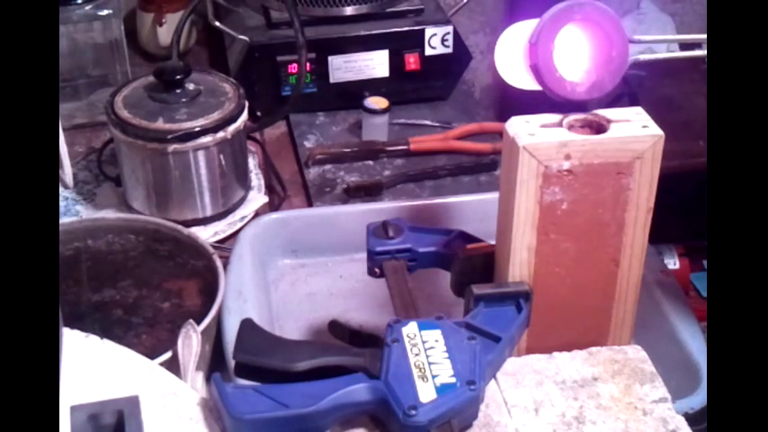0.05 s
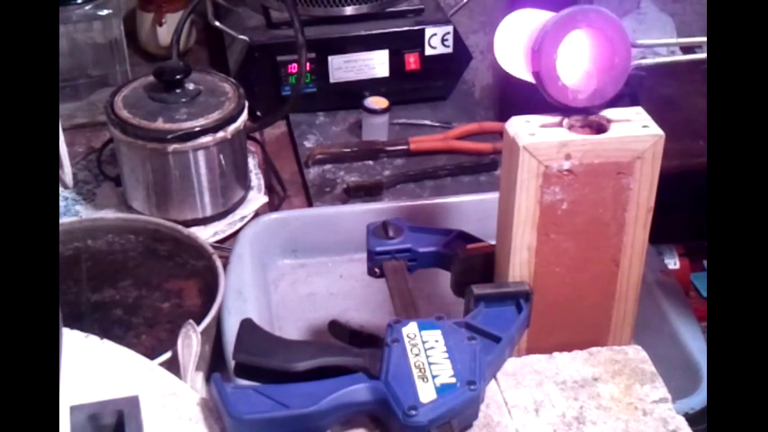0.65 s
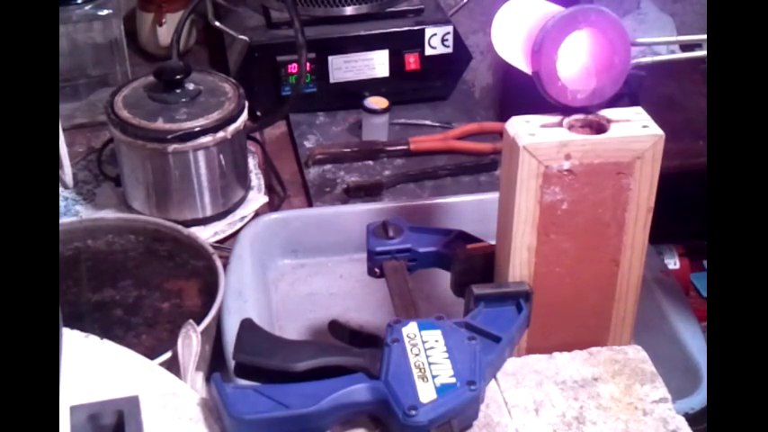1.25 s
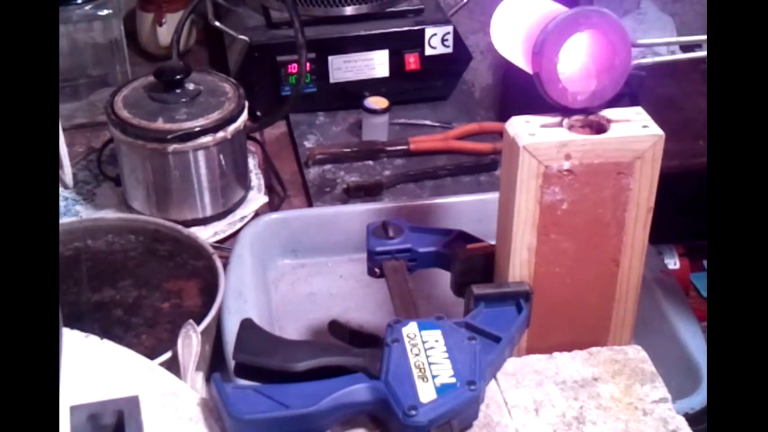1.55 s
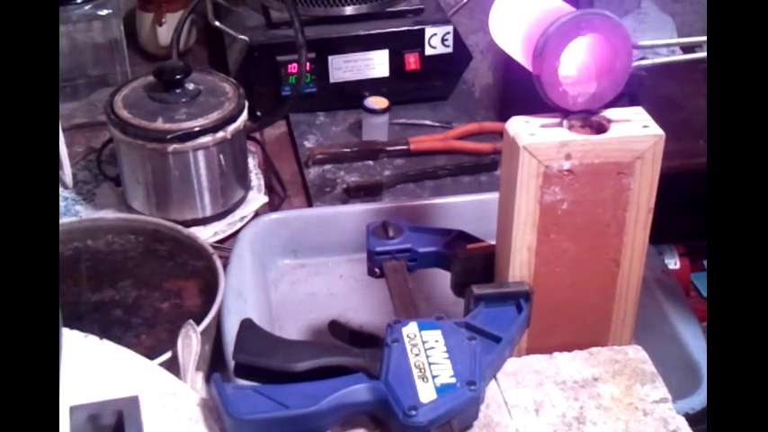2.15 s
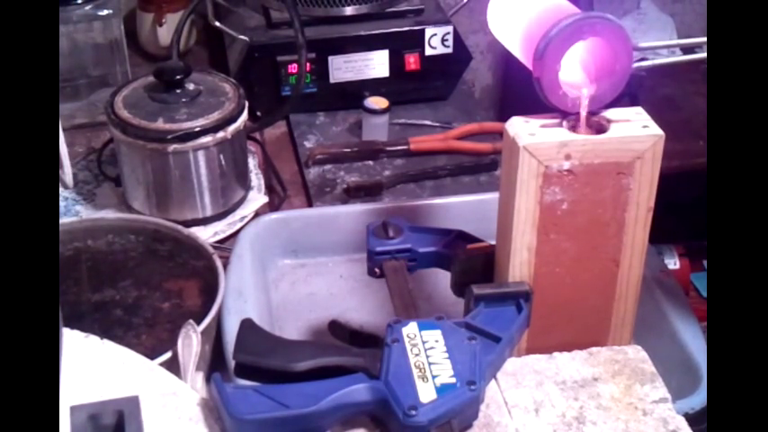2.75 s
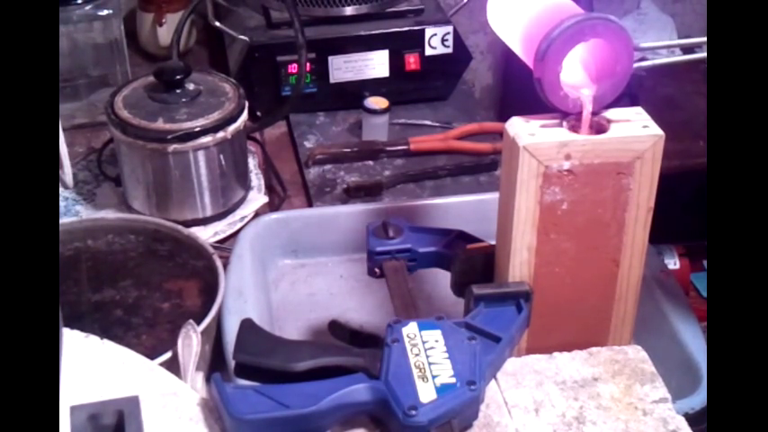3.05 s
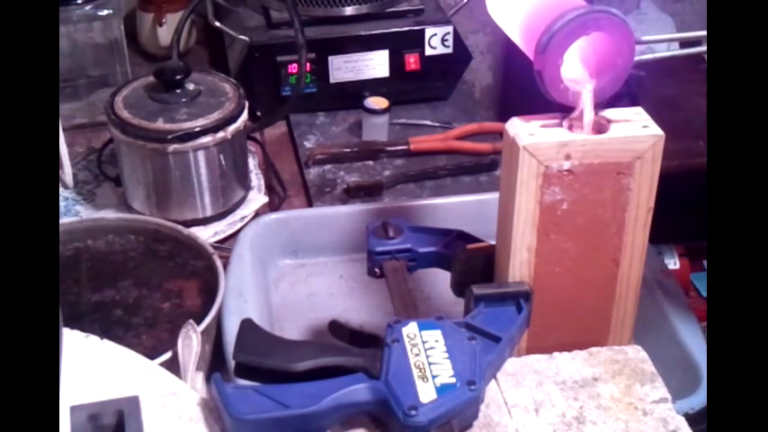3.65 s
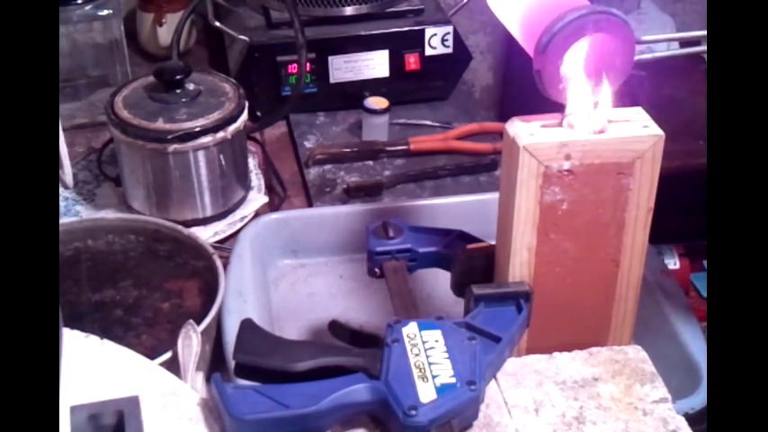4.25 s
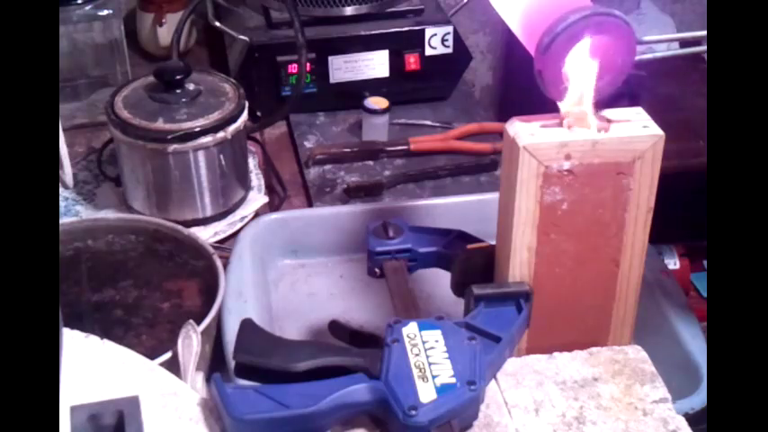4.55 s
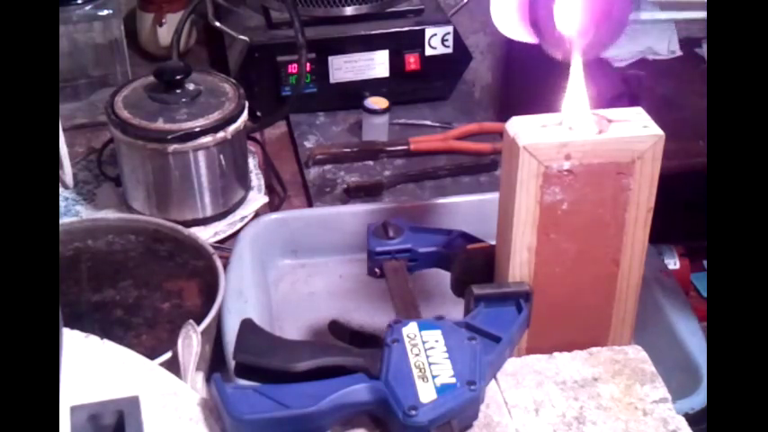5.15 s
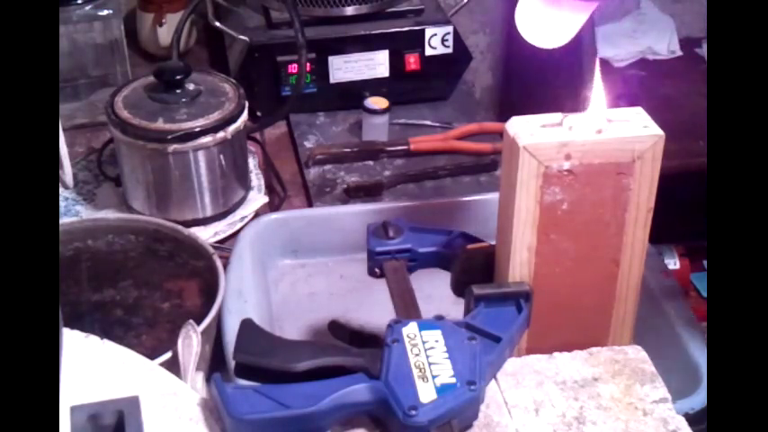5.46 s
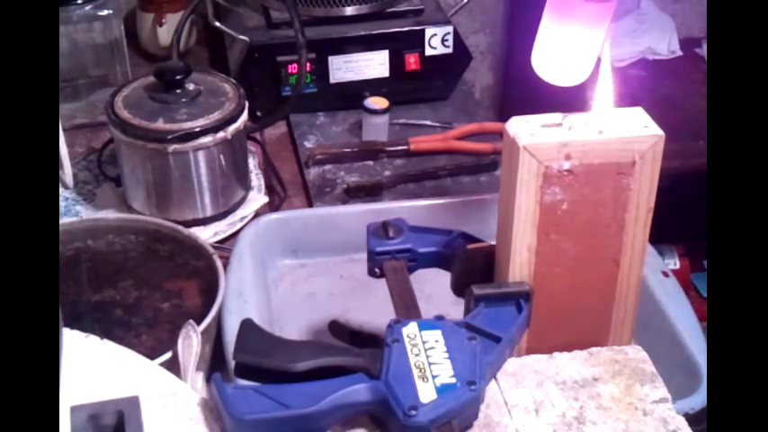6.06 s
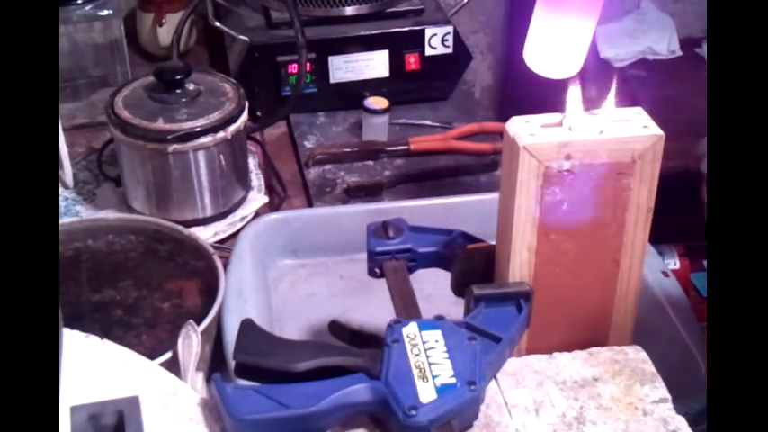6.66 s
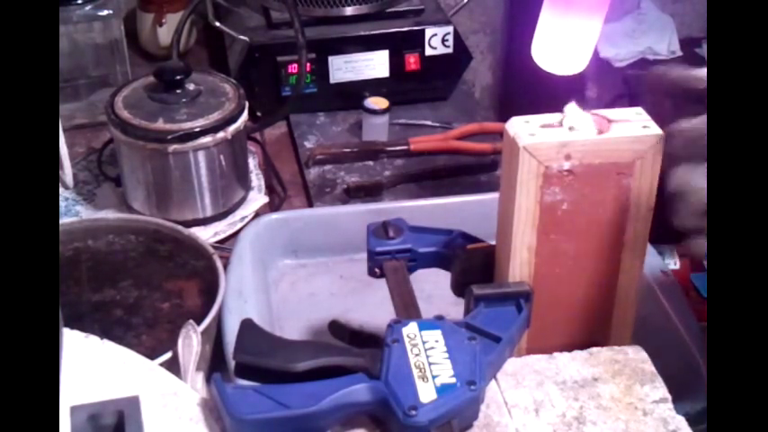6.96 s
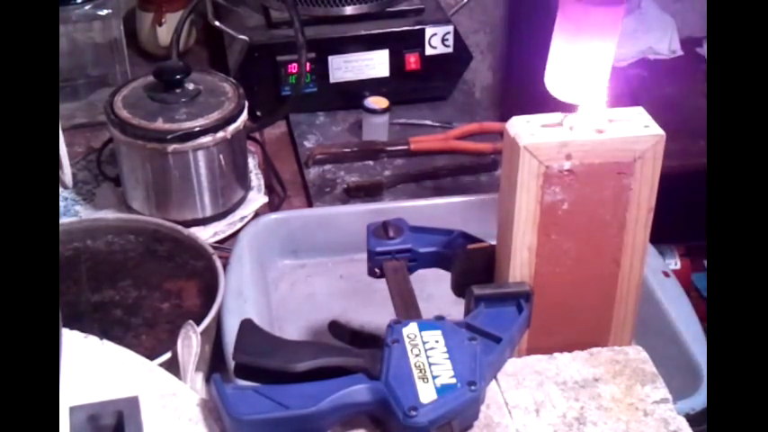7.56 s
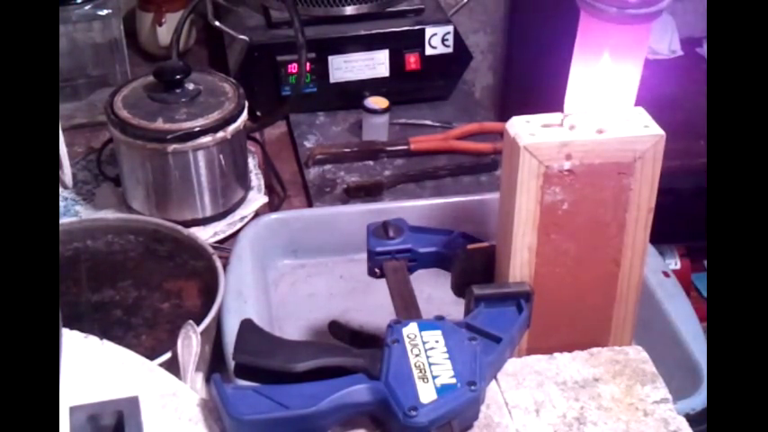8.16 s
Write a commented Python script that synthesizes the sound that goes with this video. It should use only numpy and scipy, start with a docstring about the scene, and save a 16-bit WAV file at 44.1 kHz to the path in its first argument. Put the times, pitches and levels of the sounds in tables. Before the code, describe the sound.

Furnace fans drone with a throbbing electrical hum and airy hiss, with one soft, dull puff of igniting fumes near the end.

```python
"""Two furnace fans drone in a small workshop from the first moment, turning near 40 times a second.
They throb slowly against each other and the mains hum, while a motor runs beside them
and air hisses through the resonances of the housing. The whole bed gently swells and sinks.
Near 6.8 s, fumes at a mould of molten metal light with one soft puff, and the fans run on."""
import sys
import numpy as np
from scipy import signal
from scipy.fft import rfft, irfft
from scipy.io import wavfile

SR = 44100
rng = np.random.default_rng(int(sys.argv[2]) if len(sys.argv) > 2 else 0)


def inscribe(sig):
    """Save sig as 16-bit PCM at rate SR to the path in sys.argv[1].

    A 1-D sig is mono; a 2-D sig holds one channel per row.
    Samples are clipped to [-1, 1] before scaling.
    """
    pcm = np.round(np.clip(np.atleast_2d(sig).T, -1, 1) * 32767)
    wavfile.write(sys.argv[1], SR, pcm.astype(np.int16))


N = 366946
TIME = np.arange(N) / SR
BINS = np.fft.rfftfreq(N, 1 / SR)


def fan_drone(turns, second_fan_hz=40.065, mains_hz=60.0):
    """The main fan's tones throb against the mains hum and the second fan; other orders waver alone."""
    # Blade tones beside hum harmonics. Each row: multiple of the speed, fan level in dB, hum level in dB.
    hum_beats = [(3, -37, -40.5), (6, -51, -63), (9, -58, -64.5)]
    # Orders both fans sound. Each row: multiple of the speed, main fan in dB, second fan in dB.
    fan_beats = [(4, -58.5, -47.5), (7, -61, -61)]
    # The restless fifth order, near 200 Hz. Each row: time in seconds, level in dB.
    fifth_order = [(0.0, -44.5), (0.32, -40), (0.64, -43.5), (1.28, -40), (1.6, -44.5), (2.08, -37.5),
                   (2.16, -43.5), (2.72, -41.2), (2.88, -48), (3.28, -38.5), (3.84, -44), (4.24, -35),
                   (4.4, -46.5), (6.8, -39.5), (7.2, -43.5), (7.76, -36), (7.84, -45), (8.32, -44)]
    # The restless eighth order, near 320 Hz. Each row: time in seconds, level in dB.
    eighth_order = [(0.0, -58), (0.24, -47), (1.45, -47), (1.57, -60), (2.29, -44.5), (3.01, -54),
                    (3.5, -40.5), (3.74, -58.3), (3.98, -46), (5.31, -54.5), (5.91, -50), (6.03, -59),
                    (6.27, -47.5), (8.32, -49.5)]
    # Overtones of the main fan alone. Each row: multiple of the speed, level in dB.
    overtones = [(2, -51), (12, -49), (13, -61.5), (15, -59.5), (16, -59.5), (18, -59.5)]
    second_turns = second_fan_hz * TIME
    hum_turns = 2 * mains_hz * TIME / 3  # three blades at this speed would match the hum
    drone = throb(turns, hum_turns, hum_beats, dip_s=0.25, waver=0.034, waver_hz=2.5)
    drone += throb(turns, second_turns, fan_beats, dip_s=0.016, waver=0.097, waver_hz=1.1)
    for order, levels in (5, fifth_order), (8, eighth_order):
        drone += gain_of(curve(levels)) * tone(order * second_turns, waver=0.1, waver_hz=2.7)
    return drone + sum(gain_of(db) * tone(k * turns, waver=0.15, waver_hz=1.4) for k, db in overtones)


def throb(turns, steady_turns, pairs, dip_s, waver, waver_hz):
    """Fan tones slide past those of a steady source; the wider the gap in speed, the quicker the beat."""
    lag = steady_turns - turns
    lag -= np.interp(dip_s, TIME, lag)  # every pair is in opposite phase at dip_s
    out = np.zeros(N)
    for order, fan_db, steady_db in pairs:
        pair = gain_of(fan_db) - gain_of(steady_db) * np.exp(2j * np.pi * order * lag)
        out += np.sqrt(2) * (pair * wavering_phasor(order * turns, waver, waver_hz)).real
    return out


def air_hiss(turns, level_db=-39.0, blade_chop=0.046, wobble=0.015, flutter_db=0.32):
    """Turbulence coloured by the housing, lightly chopped by three blades and once a turn."""
    # Tone colour of the rushing air. Each row: frequency in Hz, relative level in dB.
    air_colour = [(20, -9.5), (47, -12), (70, 0.5), (150, -6), (250, -4.5), (375, -10.5), (780, -14.5),
                  (1450, -15.5), (2300, -19.5), (3200, -21.5), (4400, -25.5), (5700, -28), (6400, -33.5),
                  (7050, -45.5)]
    # Resonances of the housing and the room. Each row: centre in Hz, width in Hz, lift in dB.
    resonances = [(318, 9, 5.5), (468, 55, 9.5), (528, 38, 5), (599, 62, 3.5), (640, 13, 3.5), (685, 71, 6),
                  (863, 47, 7), (929, 27, 8.5), (1016, 112, 4.5), (1174, 150, 7.5), (1274, 93, 8),
                  (1360, 49, 9), (1535, 69, 6), (1706, 160, 6.5), (1860, 89, 5), (1935, 46, 5.5),
                  (2052, 54, 5.5), (2163, 79, 8.5), (2266, 56, 9), (2357, 37, 8), (2464, 144, 3.5),
                  (2647, 91, 6), (2870, 30, 3), (3010, 87, 1), (3650, 354, 5.5), (3965, 320, 4.5),
                  (4200, 176, 5), (4520, 85, 3.5), (4851, 215, 2), (5142, 115, 4)]
    lift_db = sum(db * np.exp(-(2 * (BINS - hz) / width) ** 2) for hz, width, db in resonances)
    angle = 2 * np.pi * turns
    pulsing = 1 + blade_chop * np.cos(3 * angle) + wobble * np.cos(angle)
    rush = noise(colour(air_colour) + lift_db + echo_ripple())
    return gain_of(level_db + flutter_db * drift(rate_hz=4.6)) * pulsing * rush


def fume_puff(rise_s=0.0064, thump_db=-1.0, thump_hz=120.3, heave_hz=23.0):
    """Fumes catch fire in a dull puff whose push rings the room low down."""
    # Quick bursts that merge into the puff. Each row: start in seconds, gain in dB, decay in seconds.
    bursts = [(6.795, -44, 0.037), (6.855, -25.5, 0.031), (6.92, -38, .035)]
    # Tone colour of the flame. Each row: frequency in Hz, relative level in dB.
    flame_colour = [(10, -7), (30, -5), (70, -5), (140, 0.5), (260, -8), (600, -13), (1100, -24),
                    (4000, -61)]
    roar = noise(colour(flame_colour))
    out = np.zeros(N)
    for start, db, decay in bursts:
        age = np.maximum(TIME - start, 0)
        envelope = np.minimum(age / rise_s, 1) * np.exp(-age / decay)
        thump = gain_of(thump_db) * np.sin(2 * np.pi * thump_hz * age)
        heave = np.sin(2 * np.pi * heave_hz * age)
        out += gain_of(db) * envelope * (roar + thump - heave)
    return out


def motor(shaft_hz=58.85, level_db=-41.0):
    """An induction motor turns just under the mains rate, with faint wavering tones around it."""
    # Faint tones around the motor. Each row: frequency in Hz, level in dB.
    faint_tones = [(17.1, -63.5), (117.7, -56), (133, -53), (186.5, -54.5), (214.3, -60), (306.8, -60.5)]
    shaft = gain_of(level_db) * tone(shaft_hz * TIME, waver=0.036, waver_hz=2.4)
    return shaft + sum(gain_of(db) * tone(hz * TIME, waver=0.96, waver_hz=0.93) for hz, db in faint_tones)


def echo_ripple():
    """Echoes from the bench and walls comb the treble into fine, still ripples, in dB."""
    delays_s = rng.uniform(0.004, 0.035, 24)
    ripple = sum(np.cos(2 * np.pi * (BINS * delay + rng.random())) for delay in delays_s)
    return evened(ripple) * np.interp(BINS, [2000, 3200], [0, 1])


def tone(cycles, waver, waver_hz):
    """A wavering sine of rms one."""
    return evened(wavering_phasor(cycles, waver, waver_hz).real)


def wavering_phasor(cycles, waver, waver_hz):
    """A complex tone whose strength and phase wander."""
    wander = 1 + waver * (drift(waver_hz) + 1j * drift(waver_hz))
    return wander * np.exp(2j * np.pi * (cycles + rng.random()))


def drift(rate_hz):
    """Slow random motion of rms one about zero, rolling off above the rate."""
    return noise(-10 * np.log10(1 + (BINS / rate_hz) ** 4) - 200 * (BINS == 0))


def noise(shape_db):
    """Noise of rms one with the given spectrum."""
    return evened(irfft(rfft(rng.standard_normal(N)) * gain_of(shape_db), N))


def colour(points):
    """An EQ curve in dB, drawn through the points on a log-frequency axis."""
    hz, db = np.transpose(points)
    return np.interp(np.log(BINS + 1), np.log(hz + 1), db)


def curve(rows):
    """A control curve at every sample."""
    return np.interp(TIME, *np.transpose(rows))


def evened(x):
    """Scales to an rms of one."""
    return x / np.sqrt(np.mean(x ** 2) + 1e-20)


def gain_of(db):
    """Decibels to amplitude."""
    return 10 ** (np.asarray(db) / 20)


def scene(drone_swell=1.15):
    """Drone, air and motor swell together, the drone a little more; the fumes light once."""
    # Speed of the main fan. Each row: time in seconds, turns per second.
    fan_speed = [(0.0, 40.412), (0.6, 40.506), (1.2, 40.209), (1.8, 40.137), (2.6, 40.153), (3.4, 40.175),
                 (4.3, 40.191), (4.9, 40.251), (5.4, 40.52), (6.1, 40.358), (6.8, 40.222), (7.5, 40.151),
                 (8.32, 40.171)]
    # Slow swell riding on the levels of fans, air and motor. Each row: time in seconds, lift in dB.
    swell = [(0, 1.3), (0.25, 0.3), (0.42, 1.0), (1.36, -2), (1.84, 3.3), (2.4, 0.5), (3.1, -3),
             (3.45, -0.5), (3.85, -1.5), (4.93, 0.54), (5.15, -0.7), (5.42, 0.9), (5.97, -0.5), (6.2, 1.6),
             (6.78, -1.2), (6.9, 2), (7.62, 3.5), (8.32, 0.6)]
    turns = np.cumsum(curve(fan_speed)) / SR
    swell_db = curve(swell)
    drone = gain_of(drone_swell * swell_db) * fan_drone(turns)
    bed = gain_of(swell_db) * (air_hiss(turns) + motor())
    return (drone + bed + fume_puff())[None]


def record(dry, edge_hz=7170, offset=0.0409):
    """A steep low-pass takes off the top, and the waveform sits a little off zero."""
    low_pass = signal.firwin(1023, edge_hz, window=("kaiser", 9), fs=SR)
    return signal.oaconvolve(dry, low_pass[None], "same") + offset


dry = scene()
out = record(dry)
inscribe(out)
```